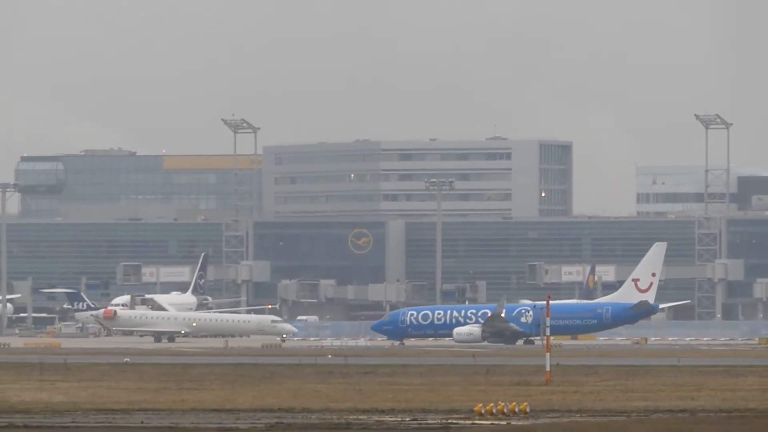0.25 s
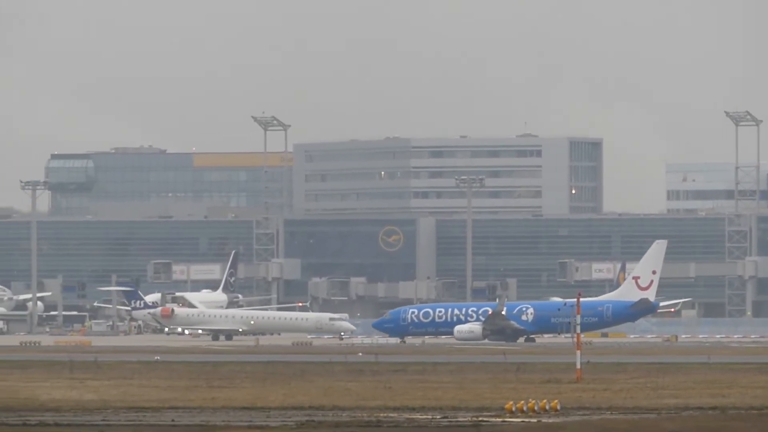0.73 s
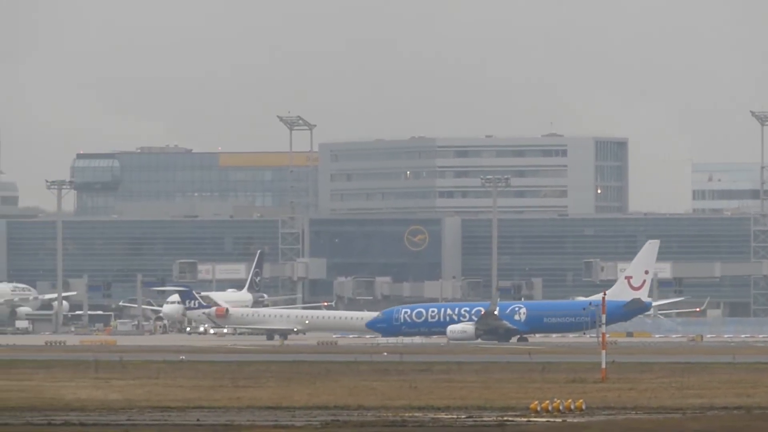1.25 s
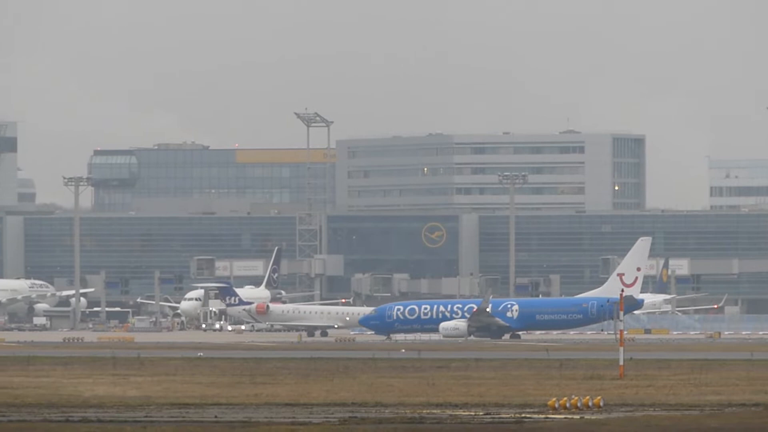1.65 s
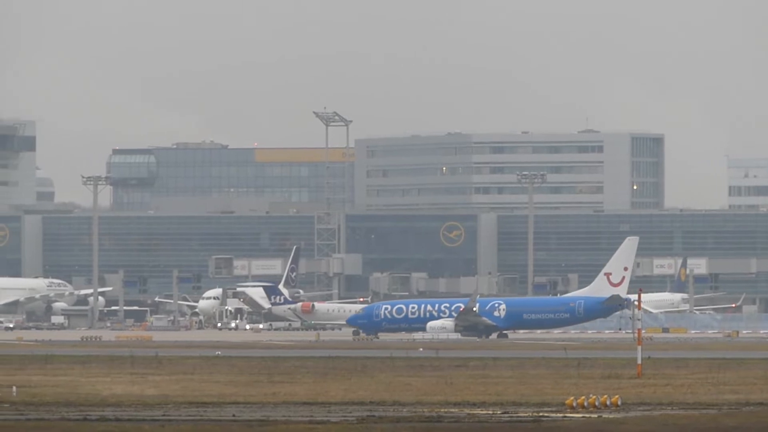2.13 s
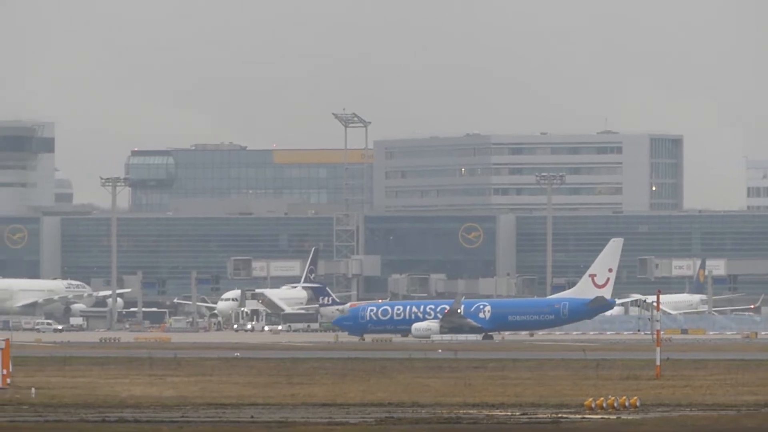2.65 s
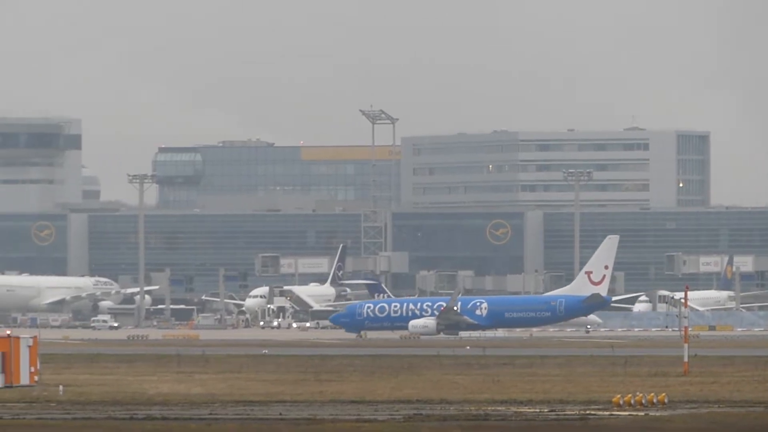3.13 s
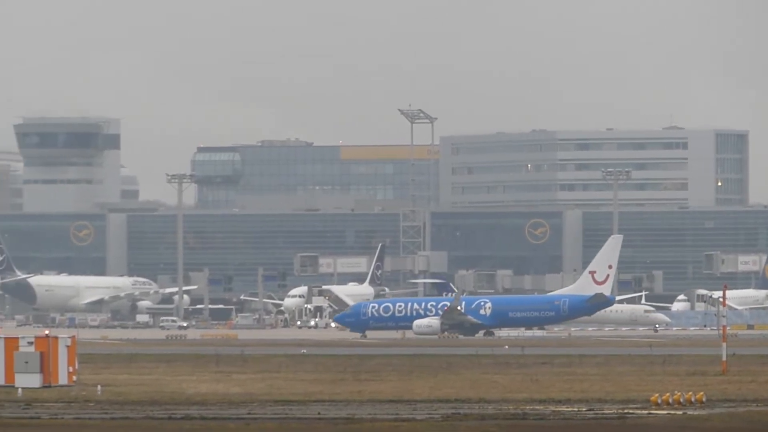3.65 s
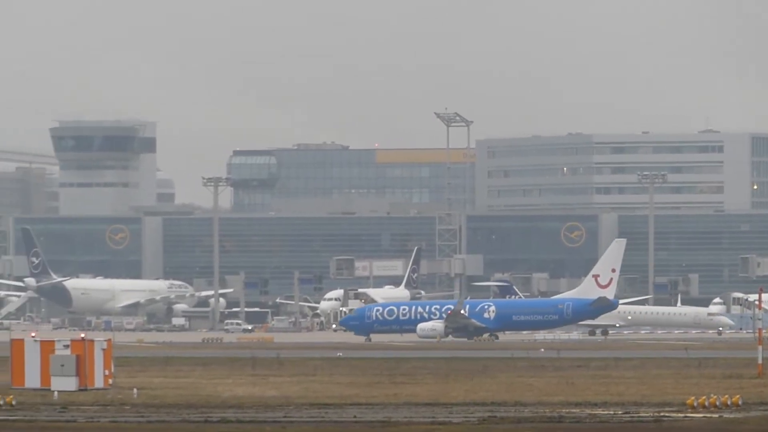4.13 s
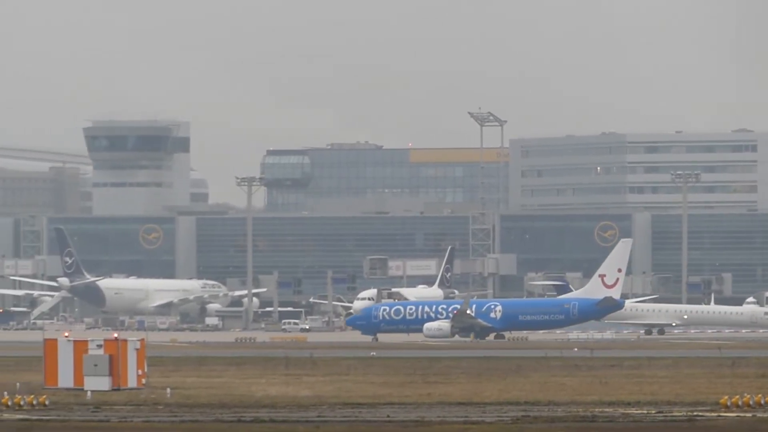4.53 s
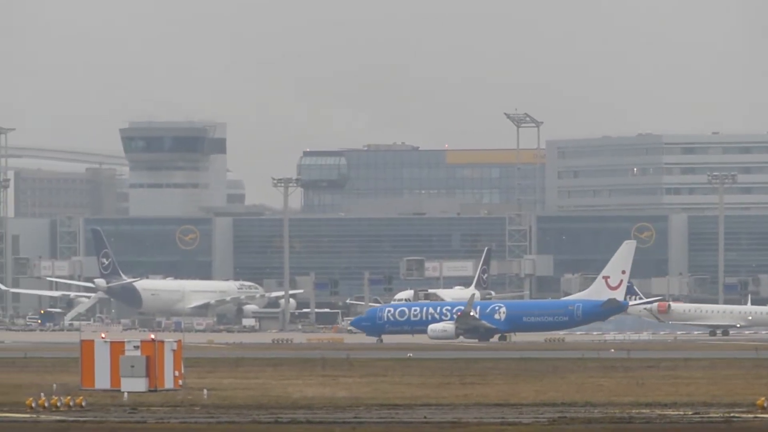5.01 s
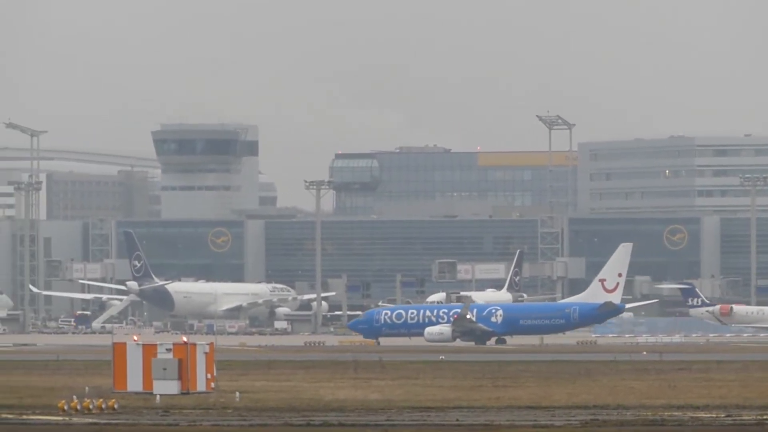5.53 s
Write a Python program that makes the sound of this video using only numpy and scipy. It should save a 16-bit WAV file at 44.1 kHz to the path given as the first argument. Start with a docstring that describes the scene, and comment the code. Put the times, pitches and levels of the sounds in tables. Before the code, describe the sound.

A distant outdoor airfield ambience runs from 0 to about 5.8 seconds without pause. The loudest part is a mid-pitched tyre roar, a band of noise centred a little above 1 kHz that slides slightly up and down. A steadier road whoosh sits just above it, with weak engine rumble below, deepening a little around 1.2 seconds, and a thin jet hiss higher up that shifts between brighter and duller. Deep bass is almost absent. The roar is fuller at the start, dips near 1.5 seconds, returns around 1.75 and 2.5, and eases somewhat after 3.9, while the whoosh lifts near 4.7 and 5.3. At about 2.98 seconds comes a very brief, bright ringing tick, followed about 0.04 seconds later by a dry broadband click, perhaps a digital glitch. Very faint, high microphone hiss lies underneath. The stereo image is mostly central, widening in the highs, and the rush continues to the end.

```python
"""Distant road traffic and taxiing jets heard across an open airfield on a still, damp day.
From the start, engine rumble, tyre roar, road whoosh and thin jet hiss swell and drift in patches as the
air moves, over faint microphone hiss and with almost no bass: each is noise shaped in short-time spectra.
About three seconds in come a brief high ringing tick, made of decaying sines, and a broadband click,
perhaps a digital glitch, made of a very short one-way pulse. The traffic then carries on to the end."""
import sys
import numpy as np
from scipy import signal
from scipy.io import wavfile
from scipy.ndimage import uniform_filter1d

SR = 44100
rng = np.random.default_rng(int(sys.argv[2]) if len(sys.argv) > 2 else 0)


def store_wav(level_fs):
    """Save 16-bit WAV to argv[1]."""
    pcm = np.round(np.clip(np.atleast_2d(level_fs), -1, 1) * 32767)
    wavfile.write(sys.argv[1], SR, pcm.T.astype(np.int16))


N = 254456  # length in samples

FFT_SIZE, HOP = 1024, 256  # samples
FRAME_S = np.arange(N // HOP + 5) * HOP / SR  # time of each spectral frame
BIN_HZ = np.fft.rfftfreq(FFT_SIZE, 1 / SR)[:, None]


def gain_of(db):
    """Decibels to amplitude."""
    return 10 ** (np.asarray(db) / 20)


def evened(x):
    """Scales to rms 1."""
    return x / np.sqrt(np.mean(x ** 2) + 1e-20)


def spectrum(points, hz):
    """Reads a spectrum table at the given frequencies, in straight lines over log frequency."""
    point_hz, value = np.transpose(points)
    return np.interp(np.log(hz + 1), np.log(point_hz + 1), value)


def follow(curve):
    """Reads each column of a time curve at the frame times."""
    seconds, *columns = np.transpose(curve)
    return [np.interp(FRAME_S, seconds, column) for column in columns]


def octaves_above(pivot_hz):
    """Distance of each bin from the pivot of a spectral tilt, in octaves."""
    return np.log2((BIN_HZ + 1) / pivot_hz)


# Stereo width. Each row: frequency in Hz, side over mid in dB.
SIDE_OVER_MID = [(60, -11), (140, -12.5), (330, -21.5), (500, -18.5), (1160, -27), (1770, -26), (2700, -19),
                 (5000, -14), (7000, -8), (8000, -15), (9500, -4), (13000, -7)]
# Stereo balance. Each row: frequency in Hz, left over right in dB.
BALANCE = [(100, 1), (500, -0.35), (2700, -0.3), (9000, 0.5)]


def rush(shape_db, level_db, patchy_db, flicker_db):
    """Stereo noise from random short-time spectra, with drifting patches and a flicker shared by all bins."""
    frames = len(level_db)
    mid_re, mid_im, side_re, side_im, patches = rng.standard_normal((frames, len(BIN_HZ), 5)).T

    # Patches spread over neighbouring bins, then over neighbouring frames
    patches = uniform_filter1d(patches, size=12, axis=0)
    patches = evened(uniform_filter1d(patches, size=16, axis=1))
    flicker = evened(uniform_filter1d(rng.standard_normal(frames), size=5))
    size = gain_of(shape_db + patchy_db * patches + flicker_db * flicker)
    size = size / np.sqrt((size ** 2).sum(0).mean())  # unit power on average, before the level

    mid = mid_re + 1j * mid_im
    side = (side_re + 1j * side_im) * gain_of(spectrum(SIDE_OVER_MID, BIN_HZ))
    lean = gain_of(spectrum(BALANCE, BIN_HZ) / 2)  # half to each ear
    pair = np.array([(mid + side) * lean, (mid - side) / lean])
    pair = pair * size * gain_of(level_db)
    # 75% overlapped Hann frames of unit spectra come out at a known rms
    _, noise = signal.istft(pair, nperseg=FFT_SIZE, noverlap=FFT_SIZE - HOP)
    return noise[:, :N] * np.sqrt(3 / 2)


# Colour of the microphone hiss. Each row: frequency in Hz, relative level in dB per Hz.
HISS_SPECTRUM = [(3000, -100), (6000, -19), (7600, -5.5), (8200, -4), (8900, 0.5), (10000, -0.5),
                 (10800, -6), (13000, -10), (15000, -16), (15400, -65)]
# Swell of the microphone hiss. Each row: time in seconds, level in dB.
HISS_LEVEL = [(.3, -63.5), (.7, -63), (1.05, -60.5), (1.5, -63), (2.1, -64), (2.7, -62.5), (3.3, -64),
              (4, -63), (4.5, -64.5), (5.1, -63), (5.6, -64.5)]


def mic_hiss():
    """Faint, patchy microphone hiss, far above the traffic in pitch."""
    level_db, = follow(HISS_LEVEL)
    return rush(spectrum(HISS_SPECTRUM, BIN_HZ), level_db, patchy_db=2, flicker_db=0.7)


# The ringing tick, then the click. Each row: start in seconds, ring level in dB, click level in dB,
# decay time constant of the click's pulse in seconds.
TICK_AND_CLICK = [(2.9797, -17, -40, .00003), (3.0224, -45, -11, .00005)]
# Modes of the ring. Each row: frequency in Hz, relative level in dB, time to fall 60 dB in seconds,
# left over right in dB, phase by which left leads in radians.
RING_MODES = [(3400, -6, .004, 0, .2), (5000, 1, .005, 0, .5), (7200, -10, .003, 0, .5),
              (9300, -7, .004, -1, .5), (11500, -11, .003, 0, .6), (13500, -9, .004, 1, .9)]


def tick_and_click():
    """Decaying sines lead in the high ringing tick, a short one-way pulse in the broadband click after it."""
    t = np.arange(400) / SR
    ear = np.array([[.5], [-.5]])  # left and right halves of a difference
    ring = np.zeros((2, len(t)))
    for hz, db, t60, lean_db, lead in RING_MODES:
        decay = gain_of(db - 60 * t / t60 + lean_db * ear)
        ring += decay * np.sin(2 * np.pi * hz * t + lead * ear)
    ring *= 1 - np.exp(-t / 0.00012)  # the ring builds over a fraction of a millisecond

    out = np.zeros((2, N))
    for start_s, ring_db, click_db, pulse_s in TICK_AND_CLICK:
        pulse = np.exp(-t / pulse_s) * gain_of(1.5 * ear)  # 1.5 dB stronger on the left
        start = round(start_s * SR)
        out[:, start:start + len(t)] += gain_of(ring_db) * ring + gain_of(click_db) * pulse
    return out


# Colour of the jets. Each row: frequency in Hz, relative level in dB per Hz before the tilt.
JET_SPECTRUM = [(1000, -100), (2000, -25), (2700, 0), (3300, 1), (3650, -3.5), (4050, -1.5), (4650, -5.5),
                (5100, -10.5), (6000, -15.5), (6800, -24.5), (7400, -31), (8200, -60), (10000, -100)]
# Swell of the jets. Each row: time in seconds, level in dB, brightness tilt in dB per octave.
JET_SWELL = [(0, -38.5, -0.5), (.55, -37, 1.5), (.95, -36.5, -1), (1.5, -39, 0), (1.73, -35.5, -0.5),
             (1.97, -37.5, 1), (2.4, -34, -1), (2.75, -36.5, 0.5), (3.1, -37, 0.7), (3.5, -35.5, 1),
             (3.9, -35, 0), (4.15, -37, 0.5), (4.5, -35.5, -1), (4.9, -38, 0.3), (5.2, -35.7, 0),
             (5.45, -38, 0), (5.77, -37, -4)]


def jet_hiss():
    """Thin hiss of taxiing jets, its spectrum tilting brighter and duller about 3600 Hz."""
    level_db, brightness = follow(JET_SWELL)
    shape_db = spectrum(JET_SPECTRUM, BIN_HZ) + brightness * octaves_above(3600)
    return rush(shape_db, level_db, patchy_db=0.5, flicker_db=0.56)


# Colour of the engines. Each row: frequency in Hz, relative level in dB per Hz before the tilt.
RUMBLE_SPECTRUM = [(30, -61), (60, -47), (100, -25.5), (140, -10), (250, -4.5), (400, 1), (560, -3),
                   (900, -9.5), (1500, -43), (3000, -100)]
# Swell of the engines. Each row: time in seconds, level in dB.
RUMBLE_SWELL = [(0, -36), (.4, -37.5), (1.2, -33.5), (1.5, -36), (2.1, -36.5), (2.6, -38.5), (3.1, -38.5),
                (3.7, -38), (4.1, -37), (4.4, -39.5), (5, -37), (5.3, -37.5), (5.77, -36.5)]
REST_DB = -38  # rumble level at rest
DEPTH_AT_REST, DEPTH_PER_DB = -0.6, 0.4  # dB per octave, and its growth per dB of swell


def engine_rumble():
    """Low engine noise that tilts about 350 Hz, reaching deeper as it swells."""
    level_db, = follow(RUMBLE_SWELL)
    depth = DEPTH_AT_REST + DEPTH_PER_DB * (level_db - REST_DB)
    shape_db = spectrum(RUMBLE_SPECTRUM, BIN_HZ) - depth * octaves_above(350)
    return rush(shape_db, level_db, patchy_db=0.8, flicker_db=0.7)


# Colour of the road whoosh. Each row: frequency in Hz, relative level in dB per Hz.
WHOOSH_SPECTRUM = [(500, -100), (1000, -32), (1500, -0.5), (2000, 0), (2300, -3.5), (2700, -12.5),
                   (3200, -40), (6000, -100)]
# Swell of the road whoosh. Each row: time in seconds, level in dB.
WHOOSH_SWELL = [(0, -25.5), (.7, -27.5), (1.3, -26), (1.95, -26.5), (2.25, -24.8), (2.7, -25.5),
                (3.3, -25.8), (4.4, -27), (4.7, -24.5), (5, -26.8), (5.3, -24.4), (5.77, -27.5)]


def road_whoosh():
    """Steady-coloured noise of the road, above the tyre roar in pitch."""
    level_db, = follow(WHOOSH_SWELL)
    return rush(spectrum(WHOOSH_SPECTRUM, BIN_HZ), level_db, patchy_db=0.2, flicker_db=0.47)


# Colour of the tyres. Each row: frequency in Hz, relative level in dB per Hz, for a centre of 1170 Hz.
ROAR_SPECTRUM = [(200, -100), (400, -33.5), (600, -16.5), (850, -6), (1050, -2), (1170, 0.5), (1350, -2.5),
                 (1600, -10), (2400, -38), (5000, -100)]
# Swell of the tyres. Each row: time in seconds, level in dB.
ROAR_SWELL = [(0, -19.5), (.5, -20), (.7, -21.5), (1.25, -21.5), (1.45, -24), (1.75, -19.5), (1.95, -22.5),
              (2.5, -19.5), (2.9, -22.5), (3.15, -20), (3.5, -21.5), (3.7, -20.5), (3.95, -24.5),
              (4.2, -22.5), (4.95, -23.5), (5.3, -21.5), (5.55, -24), (5.77, -22.5)]
# Slide of the tyres. Each row: time in seconds, centre in Hz.
ROAR_SLIDE = [(0, 1183), (.8, 1180), (1.55, 1107), (2.2, 1200), (2.9, 1170), (3.3, 1240), (3.8, 1216),
              (4.2, 1130), (5.2, 1115), (5.77, 1183)]


def tyre_roar():
    """The loudest layer: a band of tyre noise whose whole spectrum slides with speed."""
    level_db, = follow(ROAR_SWELL)
    centre_hz, = follow(ROAR_SLIDE)
    shape_db = spectrum(ROAR_SPECTRUM, BIN_HZ * 1170 / centre_hz)
    return rush(shape_db, level_db, patchy_db=0.38, flicker_db=0.43)


def scene():
    """The microphone hiss, the tick and click, the jets and the road traffic together."""
    return mic_hiss() + tick_and_click() + jet_hiss() + engine_rumble() + road_whoosh() + tyre_roar()


def record(dry):
    """Limits the band with a steep linear-phase low-pass at 16 kHz."""
    low_pass = signal.firwin(511, 16000, window=("kaiser", 9), fs=SR)
    return signal.oaconvolve(dry, low_pass[None], "same")


dry = scene()
out = record(dry)
store_wav(out)
```